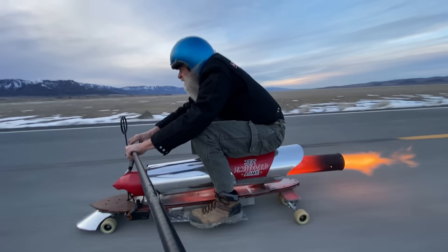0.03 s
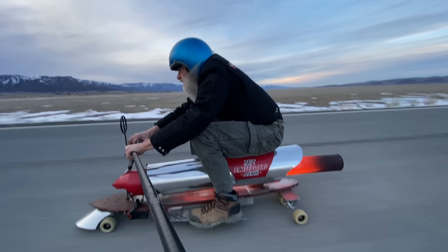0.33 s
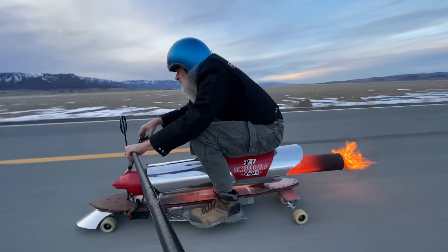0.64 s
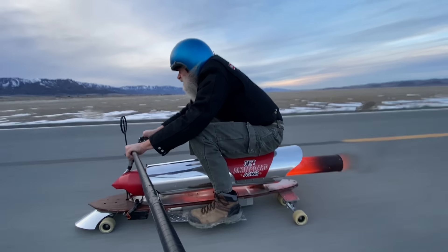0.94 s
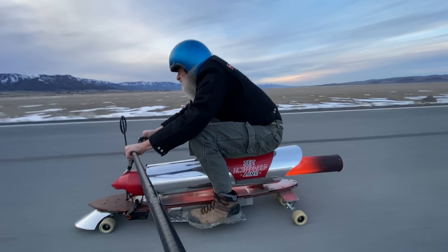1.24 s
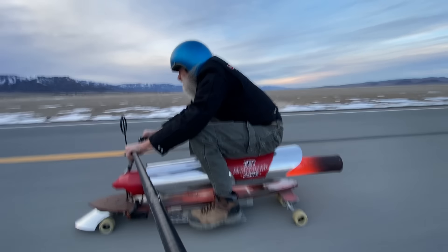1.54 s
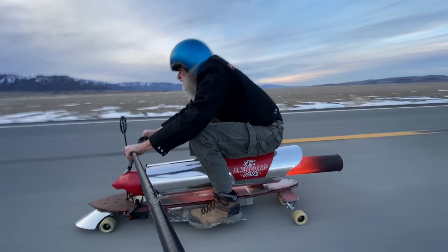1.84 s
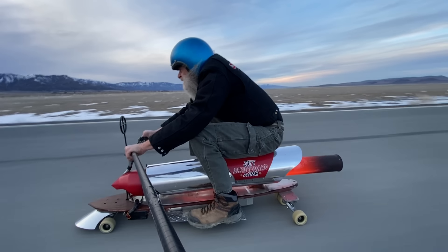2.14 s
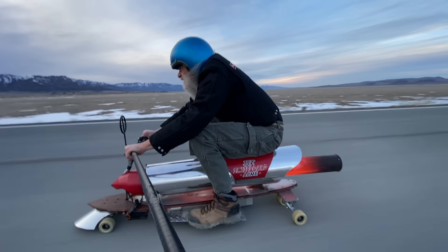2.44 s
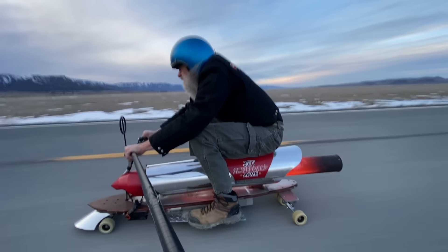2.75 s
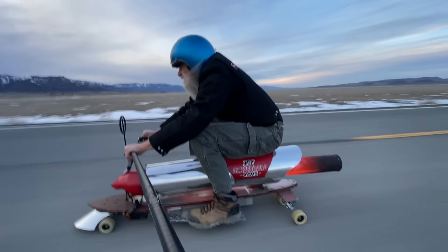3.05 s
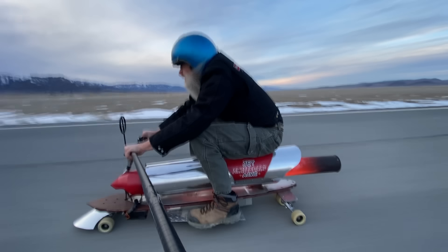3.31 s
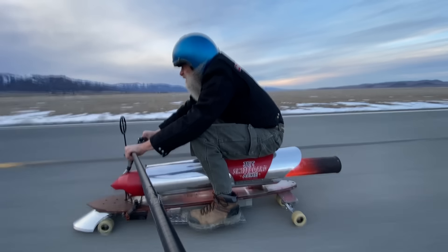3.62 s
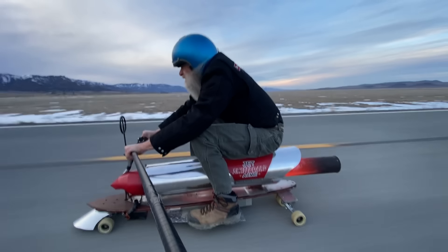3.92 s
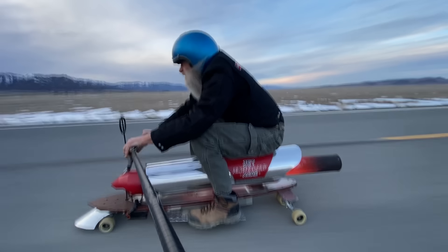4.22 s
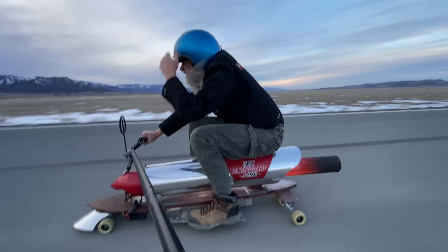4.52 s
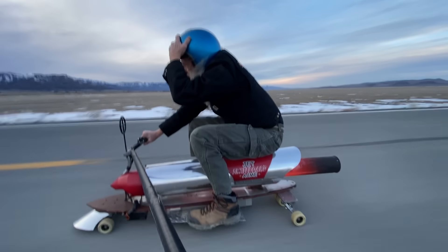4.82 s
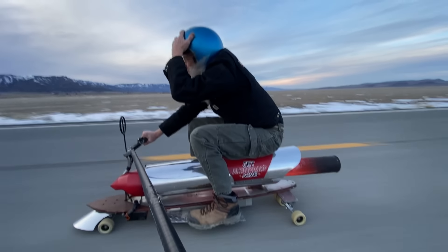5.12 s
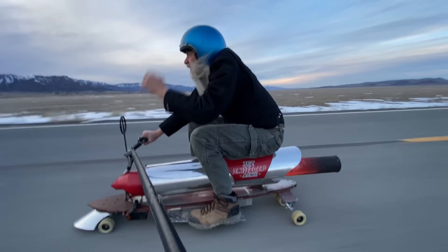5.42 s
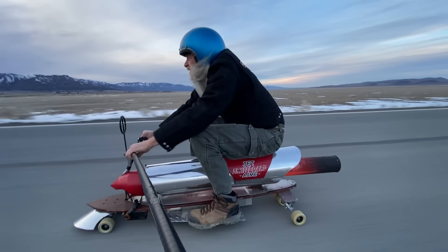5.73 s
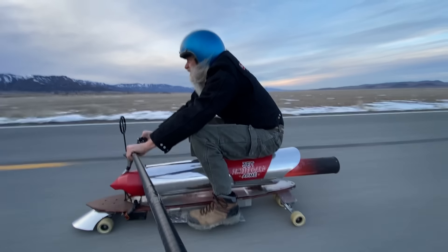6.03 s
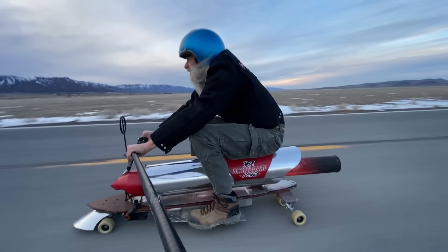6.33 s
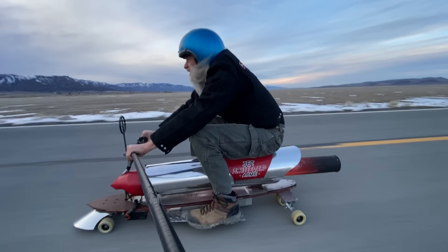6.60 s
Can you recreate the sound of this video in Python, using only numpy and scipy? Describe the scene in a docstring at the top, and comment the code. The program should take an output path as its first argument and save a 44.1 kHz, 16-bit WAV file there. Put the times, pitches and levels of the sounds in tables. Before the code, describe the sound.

A jet-powered skateboard roars briefly, shuts off and flutters out, then coasts along a paved road with soft wheel hiss and gusting wind.

```python
"""On an open road, a pulsejet skateboard races along, heard from a camera on a pole at its front.
The jet fires about 116 times a second, is shut off, hoots softly once and flutters out.
The board coasts on: hard wheels roll and hiss on asphalt, and gusts thump and tear at the
microphone openings. The camera turns its volume down under the jet, then slowly back up."""
import sys
import numpy as np
from scipy.fft import rfft, irfft, next_fast_len
from scipy.io import wavfile
from scipy.ndimage import uniform_filter1d, map_coordinates

SR = 44100
rng = np.random.default_rng(int(sys.argv[2]) if len(sys.argv) > 2 else 0)


def unload_audio(sound):
    """Save the sound as a 16-bit wav file, at the path given as the first command line argument."""
    columns = np.transpose(np.atleast_2d(sound))
    # keep every value between -1 and 1, then stretch to whole-number steps
    steps = np.round(np.clip(columns, -1, 1) * 32767)
    wavfile.write(sys.argv[1], SR, steps.astype(np.int16))


N = 298116


def pulsejet(shut_off_s=.385, jitter_rad=.03, mellowing=.035, sharpness=12):
    """Each firing makes the pipe buzz and gives a crack at the pressure peak, over the exhaust's roar."""
    # how often the jet fires (time [s], rate [Hz])
    firing_rate = [(0, 115), (.05, 113.5), (.11, 116), (.2, 116.3), (.26, 117), (.3, 121), (.335, 121),
                   (.38, 116)]
    # the pipe's tones (multiple of the firing rate, relative level [dB])
    pipe_tones = [(1, 0), (2, -8.5), (3, -15.5), (4, -13), (5, -19), (6, -26.5), (7, -23.5), (8, -41),
                  (9, -25), (10, -26), (11, -27), (12, -25), (13, -31), (14, -30.5)]
    # swirling exhaust and the crack of a firing (frequency [Hz], relative level [dB])
    roar_spectrum = [(30, -26), (80, 1.5), (150, 4), (270, 1), (420, 4), (560, -4.5), (720, -9),
                     (1000, -10), (1380, -6.5), (1900, -18.5), (4000, -23), (15000, -38)]
    crack_spectrum = [(300, -25), (900, 14), (1400, 4.5), (1900, -1), (2500, 6.5), (4200, 4), (6000, -9),
                      (8300, -4), (10200, -6.5), (12500, -13.5), (16000, -15)]
    rate_hz, = curves(firing_rate)
    tone_db, blast_db = thrust()
    phase = 2 * np.pi * np.cumsum(rate_hz) / SR + jitter_rad * wobble(110) + 1.8
    tone = 0
    for k, db in pipe_tones:
        # overtones waver, and fade as the blast weakens
        overtone_db = wobble(40.6) + mellowing * k * (blast_db - blast_db[0])
        steepening = .95 * (k - 1) ** 1.6  # gives each pressure wave a steep front
        tone += amp(db + (k > 1) * overtone_db) * np.cos(k * phase + steepening)
    pipe = amp(tone_db + 1.5) * tone
    roar_db = (tone_db + blast_db) / 2 - 4
    roar = amp(roar_db) * noise(roar_spectrum, alike=[(200, .56), (1400, .54), (4000, .16)])
    pulses = .07 + np.exp(sharpness * (np.cos(phase) - 1)) * flicker(1.6, 118.3)
    crack = amp(blast_db) * unit(pulses * flicker(2.3, 2500) * noise(crack_spectrum, alike=.81))
    # the camera body shields the left side from middle tones (frequency [Hz], right over left [dB])
    shield = [(200, .5), (380, 4), (1300, 3.5), (2300, -5)]
    shade = lambda hz: amp(along(shield, hz) * np.array([[-.5], [.5]]))
    drone = filtered(late_left(pipe + roar, lag_ms=.5), shade)
    running = np.clip((shut_off_s - clock()) / .012 + .5, 0, 1)
    return running * (drone + late_left(crack, lag_ms=.19) * pan(left_db=-3.5))


def thrust(fuel_cut_s=.31, sag_db_per_s=14.5, tone_fall_db_per_s=172, blast_fall_db_per_s=440):
    """Relative dB of pipe tone and blast: the blast sags, then dies faster once the fuel is cut."""
    starved_s = np.clip(clock() - fuel_cut_s, 0, .5)
    sag_db = sag_db_per_s * np.minimum(clock(), fuel_cut_s)
    return -tone_fall_db_per_s * starved_s, -15.5 - sag_db - blast_fall_db_per_s * starved_s


def afterburn(hoot_s=.484, hoot_hz=132, hoot_db=-21.5, lit_s=.37, spent_s=1.57, fade_s=.019):
    """The last fuel flares and makes the hot pipe hoot once, then flutters in the gusts until spent."""
    # the dying flame (frequency [Hz], relative level [dB])
    flame_spectrum = [(40, -31), (85, -13), (115, 0.5), (135, 2), (170, -6.5), (230, -9), (280, -6.5),
                      (400, -18), (800, -23), (2000, -62)]
    t = clock()
    phase = 2 * np.pi * hoot_hz * t + .59 * wobble(59.2)
    tone = unit(np.sin(phase) + amp(-13) * np.sin(2 * phase))
    hoot = amp(hoot_db) * swell(hoot_s, length=.072) * tone
    alight = np.exp(-np.abs(t - np.clip(t, lit_s, spent_s)) / fade_s)
    _, draught = gusts()
    flame = unit(flicker(1.5, 35.86) * noise(flame_spectrum, alike=.078))
    return hoot + amp(7) * alight * draught * flame


def wind(slowing_db_per_s=1.0):
    """Headwind and gusts thump each microphone opening separately, under a rush of passing air."""
    # low thumping and rushing air (frequency [Hz], relative level [dB])
    buffet_spectrum = [(20, -38), (35, -9), (60, 2.5), (90, 1), (150, -2.5), (250, -6.5), (400, -10.5),
                       (800, -24), (2000, -72)]
    rush_spectrum = [(80, -47), (190, -1), (330, -3.5), (520, -4), (800, -9), (1300, -18.5), (2200, -35.5),
                     (4000, -43), (9000, -54)]
    gusting, rushing = gusts()
    headwind = amp(-47 - slowing_db_per_s * clock())  # fades as the board slows
    lumps = np.array([flicker(2.2, 30), flicker(2.2, 30)])
    flutter = np.array([flicker(1.8, 55), flicker(1.8, 55)])
    buffet = amp(4) * np.hypot(headwind, gusting) * unit(lumps * noise(buffet_spectrum, alike=.05))
    rush = rushing * unit(flutter * noise(rush_spectrum, alike=.067))
    return buffet + rush


def gusts():
    """Strengths of thumping and rushing air: each gust builds to a peak and dies away."""
    # gusts (peak time [s], build-up [s], die-away [s], relative thump [dB], relative rush [dB])
    gust_list = [(.5, 0.2, 0.39, -33, -36.5), (.95, 0.086, 0.066, -51, -32),
                 (1.24, 0.38, 0.47, -31.5, -34.5), (1.58, 0.11, 0.11, -31.5, -28),
                 (2.28, 0.1, 0.33, -43, -51.5), (4.06, 0.14, 0.093, -48, -55), (4.32, 0.17, 1, -64, -40.5),
                 (4.9, 0.2, 0.089, -43, -41), (5.06, 0.2, 0.033, -36.5, -45)]
    t = clock()
    power = 0
    for s, build, die, buffet_db, rush_db in gust_list:
        shape = np.exp(-np.abs((t - s) / np.where(t < s, build, die)) ** 1.64)
        power += (amp([[buffet_db], [rush_db]]) * shape) ** 2
    return np.sqrt(power)


def eddies(waver_hz=200):
    """Swirls of air rasp and whistle on the left opening's edge; gusts fray into weaker rasps."""
    # swirls (time [s], length [s], relative level [dB], whistle pitch [Hz])
    swirls = [(1.029, 0.059, -31, 3640), (1.128, 0.0091, -31, 2600), (1.322, 0.027, -29, 2520),
              (1.402, .044, -31.5, 3540), (1.444, 0.0082, -31, 2540), (1.527, 0.035, -29, 3000),
              (1.588, 0.049, -25.5, 3510), (1.642, 0.014, -28.5, 2900), (1.7, 0.038, -34.5, 2710),
              (2.17, 0.027, -40, 2500)]
    # tearing air (frequency [Hz], relative level [dB])
    tear_spectrum = [(200, 4), (600, 4.5), (1100, 4), (1600, 4.5), (2050, -1.5), (2600, 1.5), (3500, -7.5),
                     (4500, -15.5), (6500, -19), (9000, -29), (15000, -69)]
    drift = 2 * np.pi * np.cumsum(waver_hz * wobble(1500)) / SR
    edge_tones = sum(amp(db) * swell(s, length) * np.sin(2 * np.pi * hz * clock() + drift)
                     for s, length, db, hz in swirls)
    whistle = amp(-8) * edge_tones * unit(flicker(2.5, 400))
    tear = bursts(swirls) * unit(flicker(1.8, 170)) * rasp(tear_spectrum, ragged_db=2.5)
    _, rushing = gusts()
    fray = amp(-13) * rushing * unit(flicker(2.5, 70)) * rasp(tear_spectrum, ragged_db=2.5)
    return (tear + whistle) * pan(left_db=30) + fray * pan(left_db=6)


def wheels(bumpy_db=.8, patchy_db=2, hiss_db=-58):
    """Hard wheels on coarse asphalt make a gritty hiss and a roar that rings in the board."""
    # the roar on rougher and smoother asphalt (time [s], relative level [dB])
    road_levels = [(.4, -44), (2.4, -44.5), (3.05, -49.5), (3.9, -47.5), (5.25, -50.5), (5.6, -48.5),
                   (6.76, -48)]
    # rolling roar and hiss (frequency [Hz], relative level [dB])
    roar_spectrum = [(40, -63), (120, -12.5), (200, -2.5), (320, 0), (420, -6), (540, 1.5), (800, -4),
                     (1200, -6), (1450, -10), (1750, -13), (2050, -13.5), (2450, -14), (2850, -20.5),
                     (3900, -20.5), (6000, -24), (12000, -54)]
    hiss_spectrum = [(2500, -18), (4200, -5), (5200, -5), (6600, 1.5), (8000, 3.5), (9200, 6),
                     (10100, 11.5), (11500, 3), (13000, 0.5), (15800, 1)]
    # how alike left and right sound (frequency [Hz], likeness [0 to 1])
    roar_alike = [(200, 0.65), (900, 0.037), (1500, 0.68), (2400, 0.32), (3500, 0.36), (7000, 0.72)]
    hiss_alike = [(4000, 0.54), (8000, 0.05), (11000, 0.68), (15000, 0.98)]
    # where wheels and board ring (frequency [Hz], width [Hz], boost [dB])
    resonances = [(521, 15, 4), (839, 23, 9), (1122, 20, 5), (1707, 63, 8), (2270, 130, 2.5),
                  (2572, 26, 11.5), (3170, 260, 6.5), (4510, 89, 7), (5050, 55, 4.5)]
    roll_db, = curves(road_levels)
    road = wobble(45)
    boost = lambda hz: amp(sum(db / (1 + (2 * (hz - centre) / width) ** 2)
                               for centre, width, db in resonances))
    ringing = unit(filtered(noise(roar_spectrum, roar_alike), boost))
    roar = amp(roll_db + 3 + bumpy_db * road) * flicker(1.1, 130) * ringing * pan(left_db=1)
    patches = amp(patchy_db * (road + wobble(90)) / np.sqrt(2))
    grain = unit(patches * flicker(1.8, 2700) * noise(hiss_spectrum, hiss_alike))
    hiss = amp(hiss_db) * flicker(1, 4.9) * grain
    ticks = flicked_grit() * noise(hiss_spectrum, hiss_alike)
    treble = (hiss + ticks) * pan(left_db=-1.5)
    # board and tyres lie in different directions from the camera
    return late_left(roar, lag_ms=.08) + late_left(treble, lag_ms=.263)


def flicked_grit(decay_s=.034):
    """Strength of the ticks from grit the wheels flick up: each starts suddenly and dies fast."""
    # flicked grains (time [s], relative level [dB])
    grains = [(2.4464, -36), (2.875, -35.5), (3.624, -33), (3.7824, -39), (5.577, -34.5), (5.8425, -41)]
    t = clock()
    return sum((t >= s) * amp(db - 11 - 60 * np.abs(t - s) / decay_s) for s, db in grains)


def bumps():
    """Each bump shakes the board a few times, making a thud."""
    # thuds (time [s], length [s], pitch [Hz], level [dB])
    thuds = [(2.285, 0.019, 115, -36), (4.041, 0.013, 260, -40.5), (4.522, 0.0077, 227, -39),
             (4.558, .012, 185, -33), (5.728, 0.0077, 614, -41)]
    return sum(amp(db) * swell(s, length) * np.sqrt(2) * np.sin(2 * np.pi * hz * (clock() - s))
               for s, length, hz, db in thuds)


def scuffs(faint_db=-53):
    """The board chatters over a few rough spots, and faintly at random between them."""
    # rough spots (time [s], length [s], relative level [dB])
    rough_spots = [(3.555, 0.046, -48), (4.038, 0.0063, -34.5), (4.055, 0.08, -44.5), (4.079, 0.015, -33),
                   (4.311, 0.022, -40), (4.85, 0.02, -49), (5.725, 0.013, -38.5), (6.145, .035, -56)]
    # the chattering board (frequency [Hz], relative level [dB])
    chatter_spectrum = [(150, -2), (450, 4.5), (1000, 3), (1900, 2), (2600, -5), (3400, -17.5), (6000, -51),
                        (15000, -42)]
    faint = amp(faint_db) * unit(flicker(4, 35))
    return (bursts(rough_spots) * pan(left_db=17) + faint) * rasp(chatter_spectrum, ragged_db=3.5)


def faint_hiss(fade_db_per_s=1.0):
    """A faint, fluttering high hiss around 5-7 kHz that slowly fades."""
    # the faint high hiss (frequency [Hz], relative level [dB])
    faint_hiss_spectrum = [(1500, -32), (4000, -17), (5300, 4.5), (6800, 12), (8500, -44), (15000, -44)]
    return amp(-66 - fade_db_per_s * clock()) * flicker(4, 60) * noise(faint_hiss_spectrum, alike=.76)


def amp(db):
    """Turn decibels into a multiplier."""
    return 10 ** (np.asarray(db) / 20)


def unit(x):
    """Scale a signal to an average power of 1."""
    return x / np.sqrt(np.mean(x ** 2) + 1e-20)


def clock():
    """Each sample's time in seconds."""
    return np.arange(N) / SR


def along(points, hz):
    """Read between (frequency [Hz], value) points, with octaves evenly spaced."""
    freqs, values = np.transpose(points)
    return np.interp(np.log(hz + 1), np.log(np.abs(freqs) + 1), values)


def curves(rows):
    """One value per sample for each column after the time."""
    times, *columns = np.transpose(rows)
    return [np.interp(clock(), times, column) for column in columns]


def wobble(rate):
    """A smooth curve through `rate` random points a second."""
    return map_coordinates(rng.standard_normal(int(N * rate / SR) + 4), [np.arange(N) * rate / SR])


def flicker(db, rate):
    """A volume that wanders by about `db` decibels, `rate` times a second."""
    return amp(db * wobble(rate))


def swell(s, length):
    """A burst of height 1 around time s that starts abruptly and ends softly."""
    offset = np.clip(2 * (clock() - s) / length, -3, 10)
    return np.exp(-np.abs(offset) ** np.where(offset < 0, 10, 2.5) / 2)


def bursts(rows):
    """The joint strength of several short bursts."""
    return np.sqrt(sum((amp(db) * swell(s, length)) ** 2 for s, length, db, *_ in rows))


def filtered(x, response):
    """Multiply each frequency in x by response(hz)."""
    size = next_fast_len(N + 8192, True)
    return irfft(rfft(x, size) * response(np.fft.rfftfreq(size, 1 / SR)), size)[..., :N]


def noise(spectrum, alike):
    """Stereo noise; `alike` is the left-right likeness, a number or (frequency [Hz], likeness) points."""
    def colour(hz):
        likeness = along(alike, hz) if np.ndim(alike) else np.full_like(hz, alike)
        angle = np.arccos(np.clip(likeness, -1, 1)) / 2
        return amp(along(spectrum, hz)) * [np.cos(angle), np.sin(angle)]
    mid, side = filtered(rng.standard_normal((2, N)), colour)
    return unit(np.array([mid + side, mid - side]))


def rasp(spectrum, ragged_db):
    """Stereo noise roughened by a fast flicker."""
    return unit(flicker(ragged_db, 600) * noise(spectrum, alike=.23))


def pan(left_db):
    """Make the left side `left_db` louder than the right, keeping the total power."""
    return unit(amp([[left_db / 2], [-left_db / 2]]))


def late_left(x, lag_ms):
    """The sound reaches the right opening first."""
    return filtered(x, lambda hz: np.exp(1j * np.pi * hz * lag_ms / 1000 * np.array([[-1], [1]])))


def gain_control(x, ceiling_db=-10.5, recovery_db_per_s=2):
    """The camera's volume drops at once under a loud sound and creeps back afterwards."""
    power = uniform_filter1d(np.mean(x ** 2, axis=0), size=3000)
    excess_db = np.maximum(10 * np.log10(np.abs(power) + 1e-12) - ceiling_db, 0)
    recovered_db = recovery_db_per_s * clock()
    return x * amp(recovered_db - np.maximum.accumulate(excess_db + recovered_db))


def scene():
    """Jet, board and wind, all close to the camera."""
    board = wheels() + bumps() + scuffs()
    return pulsejet() + afterburn() + board + wind() + faint_hiss() + eddies()


def record(dry):
    """The camera turns the jet down, rounds off the tallest peaks and cuts the highest treble."""
    held = gain_control(dry)
    rounded = held / (1 + np.abs(held / .85) ** 6) ** (1 / 6)
    return filtered(rounded, lambda hz: hz < 15830)


dry = scene()
out = record(dry)
unload_audio(out)
```